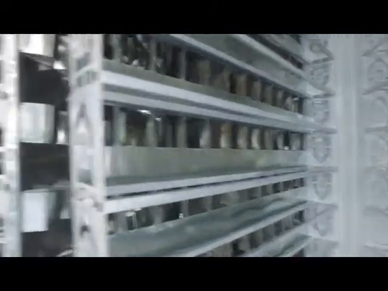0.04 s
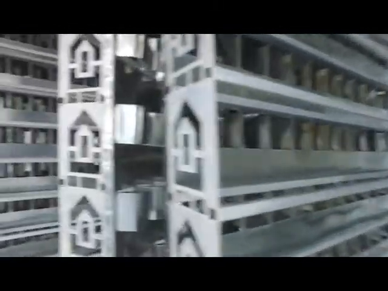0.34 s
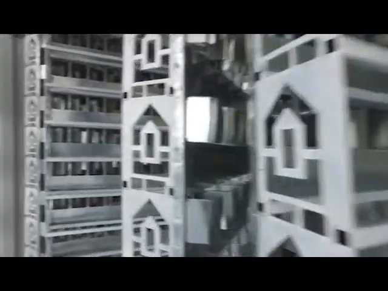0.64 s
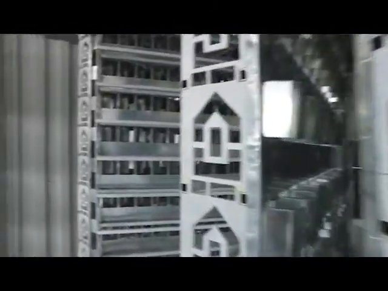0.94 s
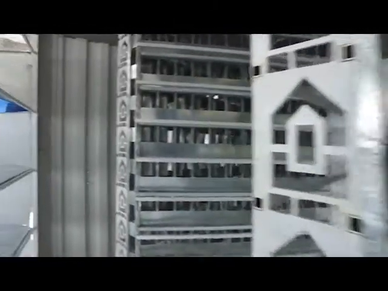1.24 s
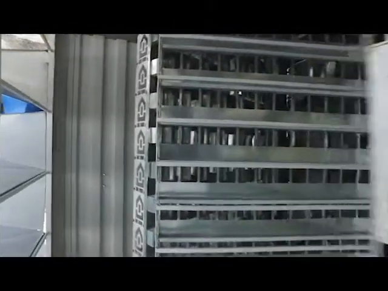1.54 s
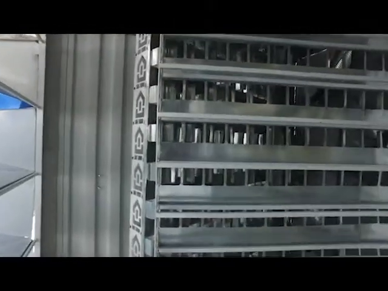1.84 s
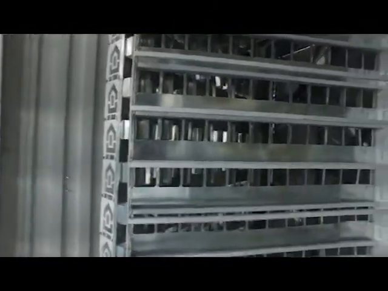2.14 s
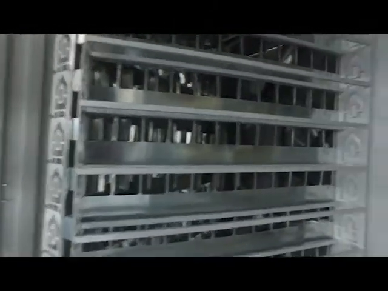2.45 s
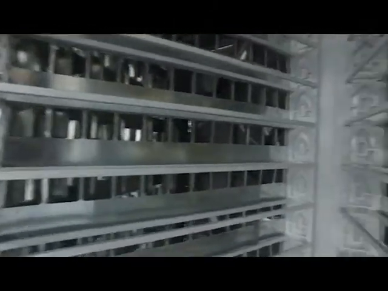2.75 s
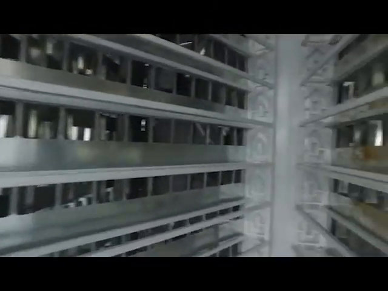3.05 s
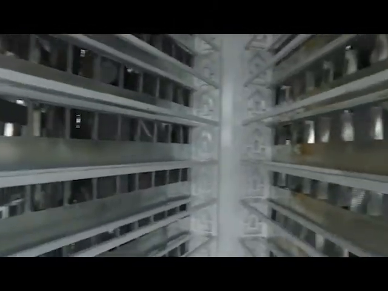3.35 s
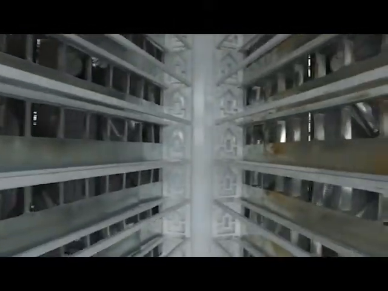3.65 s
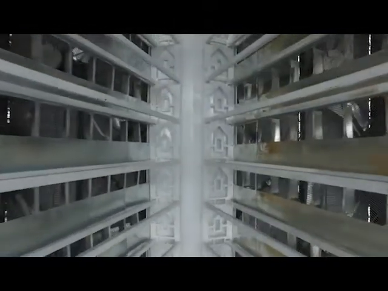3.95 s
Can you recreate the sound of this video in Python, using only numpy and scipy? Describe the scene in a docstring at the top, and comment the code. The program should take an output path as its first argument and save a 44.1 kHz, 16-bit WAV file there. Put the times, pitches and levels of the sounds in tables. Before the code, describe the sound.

Cooling fans roar steadily inside a steel container, with deep rumble and thin hiss.

```python
"""Cooling fans roar in a steel shipping container full of metal racks; the microphone is carried past them.
Their turbulence booms in the box over a shaft hum, and standing waves swell and fade along the way.
Air washes through the racks, metal buzzes in a fast rhythm and a thin hiss throbs.
A bright jet of air hisses at first and shuts off; one light knock, scuffs and brief rushes of air follow."""
import sys
import numpy as np
from scipy import signal
from scipy.fft import rfft, irfft
from scipy.io import wavfile
from scipy.ndimage import uniform_filter1d

SR = 44100
rng = np.random.default_rng(int(sys.argv[2]) if len(sys.argv) > 2 else 0)


def file_out(sig):
    """Save sig as 16-bit WAV at sys.argv[1]."""
    # one column per channel
    cols = np.atleast_2d(sig).T
    # limit, then scale
    lim = np.clip(cols, -1, 1)
    pcm = np.round(lim * 32767).astype(np.int16)
    wavfile.write(sys.argv[1], SR, pcm)


N = 176400
T = np.arange(N) / SR
FREQS = np.maximum(np.arange(N // 2 + 1) * SR / N, 1)


def undb(db):
    """Decibels to gain."""
    return 10 ** (np.asarray(db) / 20)


def unit(x):
    """Scale to rms 1."""
    return x / np.sqrt(np.mean(x ** 2))


def eq(points):
    """Gain per frequency through (Hz, dB) points, rolling off steeply outside them."""
    hz, db = np.array(points, float).T
    skirts = np.minimum(FREQS / hz[0], 1) ** 4 * np.minimum(hz[-1] / FREQS, 1) ** 4
    return undb(np.interp(np.log(FREQS), np.log(hz), db)) * skirts


def noise(gain):
    """Turbulence with the given gain per frequency, rms 1."""
    return unit(irfft(gain * np.exp(2j * np.pi * rng.random(len(FREQS))), N))


def band(hz, width_hz):
    """Noise ringing in one steep-sided resonance, rms 1."""
    return noise(1 / (1 + ((FREQS - hz) / (.5 * width_hz)) ** 2))


def ringing(modes):
    """A bank of resonances, each driven by its own turbulence."""
    return sum(undb(db) * band(hz, width) for hz, width, db in modes)


def wobble(rate_hz):
    """Smooth random modulation up to about rate_hz, rms 1."""
    return noise(1 / (1 + (FREQS / rate_hz) ** 4))


def fader(rows, column=1):
    """Gain over time from a table's dB column, ramping between breakpoints."""
    rows = np.array(rows, float)
    return undb(np.interp(T, rows[:, 0], rows[:, column]))


def swell(at, half_width):
    """A bell-shaped fade in and out around one moment."""
    return np.exp(-((T - at) / half_width) ** 2)


def leveller(x):
    """Even out the slow swings of a ringing noise to about rms 1."""
    return x / np.sqrt(uniform_filter1d(x ** 2, size=8000) + 1e-9)


def reflections(ripple_db, spacing_hz):
    """Fine peaks and dips that steel walls and racks put on a sound; they blur in the treble."""
    steps = np.arange(0, SR, spacing_hz)
    ripple = np.tanh(rng.standard_normal(N)[:len(steps)])
    distinct = 1 / (1 + (FREQS / 2600) ** 4)
    return undb(ripple_db * distinct * np.interp(FREQS, steps, ripple))


# Scuff cues (time [s], half-width [s], centre [Hz], level [dB])
SCUFF_CUES = [(1.728, .008, 4000, -57), (1.776, 0.0073, 5430, -53), (1.83, .005, 4500, -53.5),
              (1.867, .005, 5300, -52), (1.89, .007, 5500, -55), (2.047, .005, 4700, -53),
              (2.15, .005, 4800, -55), (2.304, 0.0048, 4300, -52.5), (2.355, 0.0092, 5450, -56),
              (2.423, 0.0051, 5400, -53), (3.041, .005, 4600, -51), (3.127, 0.01, 5650, -52),
              (3.223, .009, 5500, -52.5), (3.256, .006, 4480, -49), (3.315, 0.0057, 4900, -52.5),
              (3.43, 0.0063, 4700, -52), (3.508, 0.0091, 4600, -51), (3.619, 0.0034, 4740, -53),
              (3.683, .007, 4700, -51), (3.795, .005, 4900, -52), (3.865, .005, 4800, -52)]


def scuffs(grain_db=3, width_hz=1500):
    """Short grainy rustles, each with its own brightness."""
    grain = unit(undb(grain_db * wobble(300)))
    return grain * sum(undb(db) * swell(at, span) * band(hz, width_hz) for at, span, hz, db in SCUFF_CUES)


# Air rush cues (time [s], half-width [s], centre [Hz], bandwidth [Hz], level [dB])
RUSH_CUES = [(1.64, .013, 9500, 11000, -52), (1.755, 0.072, 2400, 1600, -54), (3.1, 0.21, 2390, 1600, -53),
             (3.78, .04, 1030, 250, -55)]


def air_rushes():
    """Brief whooshes of air, each a band of noise fading in and out."""
    return sum(undb(db) * band(hz, width) * swell(at, span) for at, span, hz, width, db in RUSH_CUES)


# Partials of the knock (pitch [Hz], decay [s], level before the attack ramp [dB])
KNOCK_PARTIALS = [(500, .001, -26), (950, .001, -25.5), (2100, .0016, -37)]


def knock(at_s=1.0345, attack_s=.0004):
    """One light, dry knock that dies within milliseconds."""
    age = np.maximum(T - at_s, 0)
    ring = sum(undb(db) * np.exp(-age / decay) * np.sin(2 * np.pi * hz * age)
               for hz, decay, db in KNOCK_PARTIALS)
    return ring * (1 - np.exp(-age / attack_s))


# Tone of the air in the racks (frequency [Hz], relative level [dB])
WASH_EQ = [(800, -3), (1150, 1), (1300, -4), (1430, -3.5), (1550, -2.5), (1750, -3.5), (2020, -3),
           (2220, -0.5), (2480, -3.5), (2800, -14), (3100, -11), (3800, -11.5), (4600, -14), (5200, -17.5),
           (5700, -13.5), (6400, -13.5), (7500, -13)]


def rack_wash(level_db=-54.5, flicker_db=1.07):
    """Air streaming through the racks: a soft, flickering bed."""
    air = noise(eq(WASH_EQ) * reflections(ripple_db=2.5, spacing_hz=30.03))
    return air * undb(level_db + flicker_db * wobble(41))


# Tone of the thin hiss (frequency [Hz], relative level [dB])
HISS_EQ = [(4500, -30), (6000, -5), (6400, -15), (7300, -4), (8050, -6), (8670, 3.5), (9250, -6),
           (9700, -1), (10150, -3.5), (10700, 1), (11300, -4.5), (11900, -16), (12650, -4.5), (13500, -3),
           (14050, -3), (14600, -6), (15150, 1), (15350, 2.5)]


def hiss(steady_db=-53, throb_db=-58, throb_hz=72.7, puff_share=0.13, highpass_hz=15000):
    """Thin hiss, throbbing with a short, brighter puff at a steady rate."""
    tone = eq(HISS_EQ)
    bright = tone / (1 + (highpass_hz / FREQS) ** 4)
    puffs = np.exp(-((T * throb_hz % 1 - .5) / puff_share * 2) ** 2)
    return undb(steady_db) * noise(tone) + undb(throb_db) * unit(noise(bright) * puffs)


# Tone of the buzzing metal (frequency [Hz], relative level [dB])
BUZZ_EQ = [(1200, -27.5), (1550, 5.5), (1700, 5.5), (2000, -5), (2250, 4), (2520, 0.5), (2850, -4.5),
           (3150, -2), (3550, -5), (3850, -1), (4550, -2), (5000, -5.5), (5350, -2.5), (5650, -9.5),
           (6000, -8), (6350, -12), (6850, -6.5), (9000, -32), (15000, -13)]
# Fader ride of the buzz (time [s], level [dB])
BUZZ_FADER = [(0, -74), (.55, -53.5), (.8, -56.5), (1.4, -63.5), (1.58, -56), (1.68, -50.5), (1.82, -51),
              (2.05, -52), (2.35, -50), (2.75, -53.5), (2.95, -48.5), (3.24, -49), (3.33, -53),
              (3.6, -49.5), (4, -52)]


def metal_buzz(rate_hz=300.0, depth=0.46, scatter_db=2.5, flutter_db=1.0, ceiling_db=4):
    """Metal rasping in bursts at a mains-locked rate, each with its own strength."""
    beat = 1 + depth * np.cos(2 * np.pi * rate_hz * T)
    accent_db = np.minimum(scatter_db * wobble(200) + flutter_db * wobble(25), ceiling_db)
    bursts = rng.standard_normal(N) * beat * undb(accent_db)
    tone = eq(BUZZ_EQ) * reflections(ripple_db=3.7, spacing_hz=49.65)
    return unit(irfft(rfft(bursts) * tone, N)) * fader(BUZZ_FADER)


# Tone of the air jet (frequency [Hz], relative level [dB])
JET_EQ = [(3000, -48), (5200, -20), (5800, -10), (7600, -6), (8200, -7), (8900, -3), (9450, -12.5),
          (10700, -0.5), (11900, -6), (12500, -5), (13400, -4.5), (14400, 3), (15300, 0)]


def air_jet(start_db=-41.5, sag_db_per_s=1, off_s=.645, release_s=0.055):
    """A bright air jet that sags slightly, then shuts off."""
    release = np.exp(-np.maximum(T - off_s, 0) / release_s)
    return noise(eq(JET_EQ)) * undb(start_db - sag_db_per_s * T) * release


# Shaft harmonics (fundamental [dB], octave [dB])
SHAFT_LEVELS = [-49.5, -46]
# Steady machine whines (pitch [Hz], level [dB])
WHINES = [(327.5, -55.5), (1519, -74), (1669, -71), (2503, -77)]


def shaft_hum(shaft_hz=32.5, waver_db=2.7, pitch_drift=0.00388):
    """Shaft hum and faint whines, wavering in the moving air; the octave rides the roar's rumble."""
    def tone(hz, db):
        gain = undb(db + waver_db * wobble(3.2))
        pitch = hz * (1 + pitch_drift * wobble(4.7))
        return gain * unit(np.sin(2 * np.pi * np.cumsum(pitch) / SR))
    fundamental = tone(shaft_hz, SHAFT_LEVELS[0])
    octave = tone(2 * shaft_hz, SHAFT_LEVELS[1]) * unit(fader(ROAR_FADERS, column=1))
    return fundamental + octave + sum(tone(hz, db) for hz, db in WHINES)


# Close pair of container modes in the low drone (pitch [Hz], bandwidth [Hz], relative level [dB])
DRONE_PAIR = [(122.7, 4.1, -5.5), (131, 27, -8)]
# Fader ride of the low drone (time [s], level [dB])
DRONE_FADER = [(0, -50), (.5, -38.5), (.78, -51), (.97, -31), (1.2, -57), (1.42, -38.5), (1.7, -47.5),
               (2.02, -35.5), (2.25, -49), (2.75, -39.5), (3.2, -42), (3.47, -36), (3.7, -49), (4, -48)]
# Standing waves the microphone passes through (time [s], half-width [s], pitch [Hz], level [dB])
PASSING_WAVES = [(.12, 0.4, 387, -45), (.15, 0.27, 325.4, -42), (.75, 0.19, 331, -40),
                 (1.02, 0.15, 357, -39), (1.12, 0.07, 306, -36), (1.3, 0.21, 338, -42.5),
                 (1.78, 0.14, 300, -40.5), (1.9, 0.11, 217.4, -40), (2.45, 0.22, 939, -61),
                 (3.04, 0.12, 220.3, -39), (3.33, 0.15, 419.4, -43.5), (3.78, 0.13, 418, -41),
                 (3.8, 0.34, 321, -43.5), (3.85, 0.31, 550, -49), (3.78, 0.043, 718, -49)]


def standing_waves(width_hz=7.1):
    """Standing waves swell and fade along the walk: a low drone throughout, higher notes in passing."""
    drone = leveller(ringing(DRONE_PAIR)) * fader(DRONE_FADER)
    passing = sum(undb(db) * swell(at, span) * leveller(band(hz, width_hz))
                  for at, span, hz, db in PASSING_WAVES)
    return drone + passing


# Tone of the fan turbulence (frequency [Hz], relative level [dB])
ROAR_EQ = [(18, -14), (45, -9), (64, -8.5), (92, -5.5), (120, 0), (149, -4), (180, -1), (244, -3.5),
           (314, -5), (400, -5.5), (450, -9), (540, -10.5), (640, -14.5), (720, -16), (820, -23),
           (950, -21), (1130, -24.5), (1280, -43), (1400, -34.5)]
# Air resonances of the container (pitch [Hz], bandwidth [Hz], level [dB])
CONTAINER_RESONANCES = [(82.7, 8, -49.5), (168.7, 5, -47.5), (185.7, 8.7, -45.5), (222.7, 13, -47.5),
                        (266.4, 3.9, -48), (285, 19, -48), (304.7, 7.8, -49.5), (322.7, 12, -47),
                        (354.3, 20, -47.5), (1498, 20, -64.5)]
# Resonances of the racks (pitch [Hz], bandwidth [Hz], level [dB])
RACK_RESONANCES = [(404.5, 24, -59), (469, 4.7, -59), (506.7, 16, -52.5), (529, 39, -57.5)]
# Relative fader rides along the walk, each normalised (time [s], rumble [dB], boom [dB], mids [dB])
ROAR_FADERS = [(0, -44.5, -35, -48.5), (.4, -44, -34, -46.5), (.85, -41, -37, -46),
               (1.03, -40.5, -34.5, -43.5), (1.25, -43.5, -34, -45), (1.6, -42, -33.5, -45),
               (1.95, -35.5, -33, -46), (2.3, -47.5, -33, -45), (2.65, -37.5, -32.5, -45.5),
               (3.05, -46, -35, -43.5), (3.3, -45, -35, -41), (3.52, -46, -35.5, -44),
               (3.8, -47.5, -33.5, -41.5), (4, -51, -34, -43.5)]


def fan_roar(rumble_db=-46, boom_db=-37, mids_db=-44.5, rumble_top_hz=97, boom_top_hz=413):
    """Fan turbulence in three bands, ringing container and racks and shifting as the microphone moves."""
    tone = eq(ROAR_EQ)
    deep, low = (1 / (1 + (FREQS / hz) ** 8) for hz in (rumble_top_hz, boom_top_hz))  # crossovers
    rumble = undb(rumble_db) * noise(tone * np.sqrt(deep))
    boom = undb(boom_db) * noise(tone * np.sqrt(low * (1 - deep)))
    mids = undb(mids_db) * noise(tone * np.sqrt(1 - low) * reflections(ripple_db=3.5, spacing_hz=12))
    container, racks = ringing(CONTAINER_RESONANCES), ringing(RACK_RESONANCES)
    rumble_ride, boom_ride, mids_ride = (unit(fader(ROAR_FADERS, column)) for column in (1, 2, 3))
    return rumble * rumble_ride + (boom + container) * boom_ride + (mids + racks) * mids_ride


def scene():
    """Mono mix of all sources at the microphone."""
    machinery = fan_roar() + standing_waves() + shaft_hum() + rack_wash() + metal_buzz() + hiss()
    return (machinery + air_jet() + scuffs() + knock() + air_rushes())[None]


def record(dry):
    """The microphone has one narrow notch and a steep high cut."""
    notch_hz, half_width_hz, depth, high_cut_hz = 4214, 205, 0.89, 15350
    notch = 1 - depth * np.exp(-((FREQS - notch_hz) / half_width_hz) ** 2)
    high_cut = signal.ellip(10, .2, 80, high_cut_hz, fs=SR, output="sos")
    return signal.sosfilt(high_cut, irfft(rfft(dry) * notch, N))


dry = scene()
out = record(dry)
file_out(out)
```